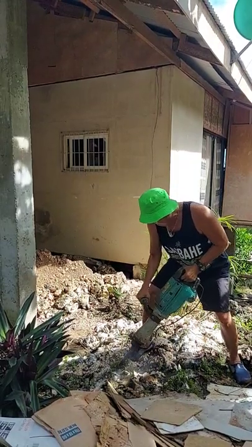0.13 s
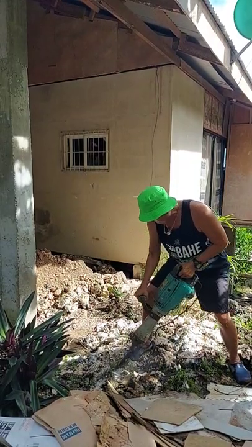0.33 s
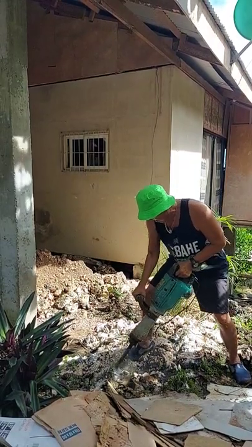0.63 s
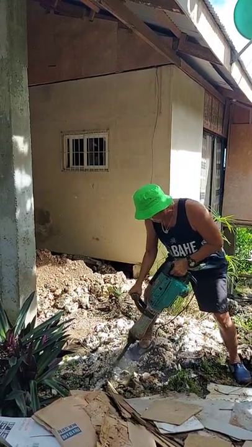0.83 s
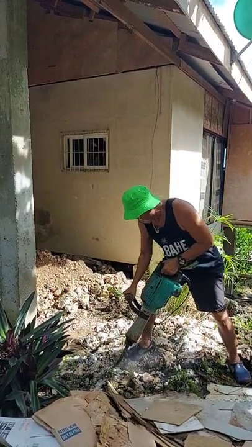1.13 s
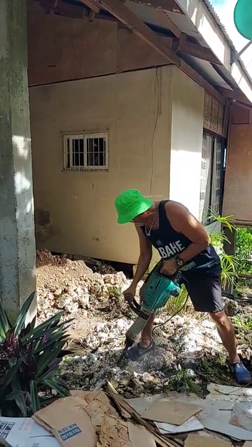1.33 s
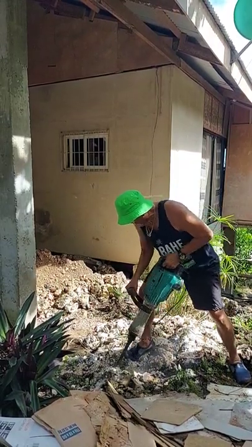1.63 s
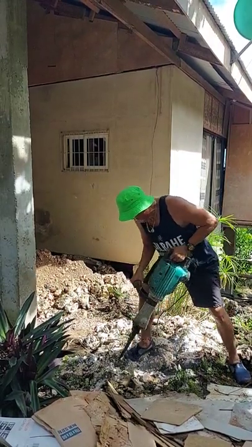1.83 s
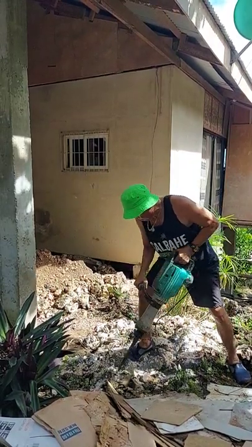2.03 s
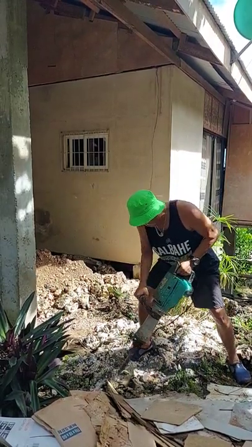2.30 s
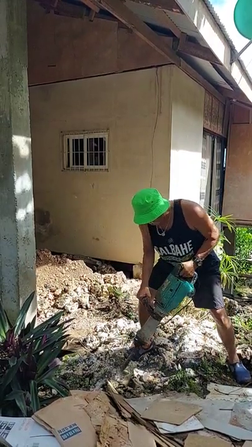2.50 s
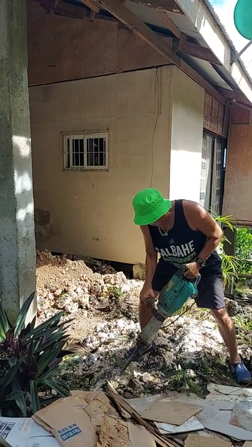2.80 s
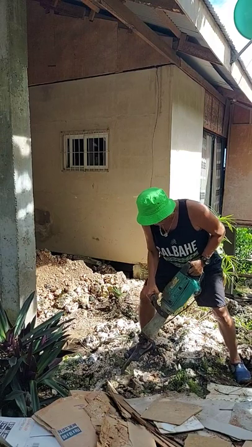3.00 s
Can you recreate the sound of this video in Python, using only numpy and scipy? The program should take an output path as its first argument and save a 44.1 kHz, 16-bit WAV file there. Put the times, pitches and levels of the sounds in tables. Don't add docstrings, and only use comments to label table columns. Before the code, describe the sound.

An electric demolition hammer works rocky ground outdoors, a few metres from a phone. Two soft idle knocks precede hard blows from 0.2 s, about 17 per second, with stony cracks, low thumps and bright steel ringing over motor roar. From 1.6 s soil muffles them; at 2.35 s they bite again, slow, ring loose near 2.8 s, and the motor fades to faint knocks around 3 s. Short wall echoes, low yard rumble.

```python
import sys
import numpy as np
from scipy import signal
from scipy.fft import rfft, irfft
from scipy.io import wavfile
from scipy.ndimage import uniform_filter1d

SR = 44100
rng = np.random.default_rng(int(sys.argv[2]) if len(sys.argv) > 2 else 0)


def linear_from_db(decibels):
    return 10 ** (np.asarray(decibels, float) / 20)


def pcm_store(signal):
    levels = np.round(np.clip(np.atleast_2d(signal), -1, 1) * 32767)
    wavfile.write(sys.argv[1], SR, levels.astype(np.int16).T)


N = 138915


def evened(x):
    return x / np.sqrt(np.mean(x ** 2) + 1e-20)


def colour(x, points, bumps=()):
    hz = np.fft.rfftfreq(len(x), 1 / SR)
    f, curve_db = np.transpose(points)
    db = np.interp(np.log(hz + 1), np.log(f + 1), curve_db)
    for centre, width, up_db in bumps:
        db = db + up_db * np.exp(-2 * ((hz - centre) / width) ** 2)
    return evened(irfft(rfft(x) * linear_from_db(db), len(x)))


def ring(t, hz, db, t60, phase=0):
    return linear_from_db(db - 60 * t / t60) * np.sin(2 * np.pi * (hz * t + phase))


def add(mix, s, sound):
    part = mix[round(s * SR):][:len(sound)]
    part += sound[:len(part)]


def row_at(table, s, other):
    return next((row[1:] for row in table if abs(row[0] - s) < .006), other)


# (time [s], crack [dB], thump [dB], thud [dB], ring [dB])
HARD_BLOWS = [(0.2238, -6, -35, -22, -14), (0.2803, -11.5, -30.5, -31, -15), (0.3427, -6.5, -35, -15, -16),
              (0.404, -9, -22, -18.5, -12.5), (0.4608, -5.5, -54, -19, -22.5),
              (0.5184, -12.5, -25.5, -22.5, -20.5), (0.5807, -8.5, -27.5, -28, -16),
              (0.6389, -6, -32, -52, -18.5), (0.6982, -9, -39, -14, -17), (0.757, -9, -37, -47, -17),
              (0.817, -8, -23.5, -15, -14.5), (0.8763, -10, -34, -23.5, -16.5),
              (0.9355, -8.5, -39, -35, -16), (0.995, -9, -40, -55, -18), (1.056, -9.5, -38.5, -48, -18.5),
              (1.113, -12, -36.5, -50, -23.5), (1.171, -11, -36, -45, -25.5),
              (1.2291, -11, -29, -28, -18.5), (1.288, -13.5, -34.5, -36, -18.5),
              (1.3498, -13.5, -35, -39, -20), (1.41, -13.5, -36, -33, -18.5), (1.4704, -15, -36, -29, -19),
              (1.5314, -12.5, -34, -47, -18), (1.5892, -11.5, -35.5, -50, -21)]
# (time [s], crack [dB], thump [dB], thud [dB], ring [dB])
MUFFLED_BLOWS = [(0.0477, -21.5, -57, -42, -38.5), (0.1068, -18, -58, -38, -40),
                 (1.6484, -16.5, -39.5, -45, -31), (1.698, -13, -49, -36, -49),
                 (1.7082, -16.5, -48, -30, -35), (1.77, -18, -58, -32, -35), (1.828, -16.5, -51, -34, -35),
                 (1.8882, -18.5, -49, -34, -36), (1.9513, -17.5, -53, -35, -42),
                 (2.0101, -17, -61, -32.5, -32), (2.0707, -18, -61, -32, -33.5),
                 (2.1299, -19, -63, -35, -36), (2.1906, -14, -54, -54, -29.5),
                 (2.2517, -16.5, -47, -28, -32), (2.3105, -17, -38, -28, -39)]
# (time [s], crack [dB], thump [dB], thud [dB], ring [dB])
LAST_BLOWS = [
    (2.371, -7.5, -25.5, -15.5, -18.5),
    (2.4296, -9, -26, -20.5, -15),
    (2.487, -9.5, -31, -18.5, -17),
    (2.5573, -7, -39, -25.5, -13.5),
    (2.6354, -8, -41, -31, -20.5),
    (2.7314, -12, -35.5, -56, -17.5),
    (2.8443, -16, -36, -28, -19),
    (2.8645, -17.5, -44, -34, -22.5),
    (3.014, -27.5, -54, -77, -65),
    (3.0627, -26, -52, -66, -64),
]


def blows():
    mix, t = np.zeros(N), np.arange(8192) / SR
    for s, crack_db, thump_db, thud_db, ring_db in HARD_BLOWS + MUFFLED_BLOWS + LAST_BLOWS:
        struck = rock(t, s, crack_db, thud_db) + ground(t, s, thump_db, thud_db)
        add(mix, s - .001, struck + chisel(t, s, ring_db))
    return mix


# (main shard [Hz], low steel pair [dB],
# high steel pair [dB], lean from the 7.8 to the 8.1 kHz mode [dB])
BLOW_LANDING = [(2750, -4.0, -2, 10), (4440, 5, 1, 1), (2050, 6, 6.0, 5), (4550, 1, -2, 3),
                (1710, 7.0, 10, -2), (4110, 8.5, 7, 1.0), (4200, 3.5, 7.5, -4), (1400, 9.5, 7.0, -2),
                (3000, -4.0, 4, 3), (1725, 1.5, -9, -3), (4629, 0, -5, 2), (1253, 4, 4, 0),
                (2980, 4.5, -0.5, -3), (1770, 0.0, 1, -2), (3150, 4.5, 1, -4), (2940, 1, 8, -3.0),
                (4140, 10, 5, -3), (1740, 3, 6, -8), (3030, -3, 6, -3), (4190, -1, 11, -5),
                (3160, 0, 5.0, -3), (1990, -3, -2.0, -11), (3760, -1, -1.0, -6), (3250, -8, 2, -4),
                (1600, 2.5, 7, -2), (1340, -7.0, 8, -1), (1225, 5.0, 7.5, -3), (2180, -2, 1, -1),
                (1701, 2, 7.5, -1), (2965, 9.0, 5, 1.5), (1154, 6, 2.5, 5.5), (3070, 4, 8, -5)]


def landing(s):
    rows = [(blow[0], *row) for blow, row in zip(HARD_BLOWS + LAST_BLOWS, BLOW_LANDING)]
    return row_at(rows, s, [3002, 0, 6, 2.5])


# (frequency [Hz], density [dB])
CRACK_SPECTRUM = [(180, -54), (300, -3), (3520, -4), (5340, -1.5), (6000, -7), (8090, -5), (9710, -20.5),
                  (11500, -6.5), (16000, -11.5)]


def rock(t, s, db, thud_db):
    muffled_db = np.clip(-15 - db, 0, 4)
    thin_db = np.clip(-23.5 - thud_db, 0, 20)
    dulling = [(12000, 13500, -6 * muffled_db), (450, 1540, -0.38 * thin_db)]
    burst = colour(rng.standard_normal(len(t)), CRACK_SPECTRUM, dulling)
    burst *= linear_from_db(-60 * t / 0.034) + linear_from_db(3.5 - 60 * t / 0.0097)
    low_hz, high_hz, shard_t60 = 1486, 4860, 0.021
    shards = ring(t, landing(s)[0], 1.5, shard_t60)
    for pitch, weak, late in rng.random((4, 3)):
        hz = low_hz * (high_hz / low_hz) ** pitch
        shards += ring(np.maximum(t - 0.003065 * late, 0), hz, -15 - 10 * weak, shard_t60)
    rise_s = 0.0014 + 0.00074 * muffled_db
    return linear_from_db(db - 6.5) * (burst + shards) * np.minimum(t / rise_s, 1)


# (frequency [Hz], level [dB], t60 [s])
CHISEL_MODES = [(1110, -44, .2), (5270, -17, .12), (5459, -13, .15), (7845, -5, .25), (8060, -11, .12),
                (8150, -4, .25), (8250, -11, .08), (11410, -15, .09), (11585, -16, .15), (12480, -22, .17),
                (13470, -30, .1), (14930, -26, .14), (15350, -27, .14)]
# (from [s], to [s], frequency [Hz], change [dB])
FREED_MODES = [
    (1.27, 1.6, 12480, 9),
    (1.27, 1.66, 8040, -7),
    (1.27, 1.66, 5370, -9),
    (2.83, 2.85, 1110, 24),
    (2.12, 2.27, 11500, 7),
    (1.25, 1.72, 11500, -13),
    (1.76, 1.78, 5370, 14),
    (1.15, 1.6, 589, 17),
    (2.7, 3.1, 500, -12),
]
# (frequency [Hz], density [dB])
RATTLE_SPECTRUM = [(2500, -46), (5000, -2), (6800, -7), (8300, 13), (9500, -26), (11500, -5), (13000, 0),
                   (15700, -1.5)]


def mode_changes(s):
    _, low_db, high_db, lean_db = landing(s)
    hz = [4000, 5200, 5500, 7900, 8050, 8300, 11400, 11600, 12400]
    db = [0, low_db, low_db, -lean_db / 2, lean_db / 2, lean_db / 2, high_db, high_db, 0]
    return [sum(up for t0, t1, c, up in FREED_MODES if t0 < s < t1 and abs(f / c - 1) < .03)
            + np.interp(f, hz, db) for f, *_ in CHISEL_MODES]


def squeak(t, wobble, chance):
    glide_s = .012
    glide = 1095 * glide_s * (0.6 + chance[3]) * np.exp(-t / (glide_s * (.7 + chance[3])))
    return ring(t, 13000, -9.5 - 6 * chance[2], 0.13, glide + 8 * wobble)


def chisel(t, s, db):
    detune, spread = rng.standard_normal((len(CHISEL_MODES), 2)).T
    chance = rng.random(len(CHISEL_MODES))
    drift = evened(uniform_filter1d(rng.standard_normal((3, len(t))), round(0.011 * SR), axis=1))
    wobble = .07 * uniform_filter1d(drift, 200, axis=1)
    grip = linear_from_db(4.5 * uniform_filter1d(drift, 60, axis=1) * np.minimum(t / 0.033, 1))
    changes, loose = mode_changes(s), s > 2.7
    hz = np.fft.rfftfreq(len(t), 1 / SR)
    modes, skirts = np.zeros(len(t)), np.zeros(len(hz))
    for k, (f, mode_db, t60) in enumerate(CHISEL_MODES):
        level_db = mode_db + changes[k]
        phase = chance[k] + wobble[(k + 1) % 3]
        modes += grip[k % 3] * ring(t, f * (1 + 0.001 * detune[k]), level_db - spread[k], t60, phase)
        skirts += linear_from_db(level_db) / (1 + ((hz - f) / 300 * 2) ** 2)
    if 1.27 < s < 1.6:
        modes += grip[2] * squeak(t, wobble[0], chance)
    fuzz = evened(irfft(rfft(rng.standard_normal(len(t))) * skirts, len(t)))
    fuzz *= linear_from_db(-13.5 - 60 * t / 0.32)
    rattle = colour(rng.standard_normal(len(t)), RATTLE_SPECTRUM) * linear_from_db(-9.5 - 60 * t / 0.25)
    noise_gain = linear_from_db(-7 if loose else 0)
    steel = modes + noise_gain * (fuzz * grip[0] + rattle * grip[1])
    clang = 1 + linear_from_db(7 - 60 * t / (.04 if loose else 0.0041))
    rebound_s = 0.0424 * (0.99 + 0.66 * chance[1])
    rebound = linear_from_db(4 * 2 * chance[0] * np.exp(-((t - rebound_s) / 0.004) ** 2))
    return linear_from_db(db) * steel * np.minimum(t / 0.00041, 1) * clang * rebound


# (time [s], frequency [Hz])
SWING_PITCH = [
    (.2801, 95),
    (.404, 65),
    (.5808, 71),
    (.6387, 73),
    (.7569, 93),
]
# (frequency [Hz], density [dB])
RUBBLE_SPECTRUM = [(30, -30), (80, 9), (200, -27), (330, 19), (600, -47), (20000, -90)]
# (frequency [Hz], level [dB], t60 [s])
BODY_MODES = [(292, -69, 0.19), (589, -43.5, 0.085)]


def ground(t, s, thump_db, thud_db):
    chance = rng.random(4)
    u = np.maximum(t - 0.0021, 0)
    usual_hz = 101.5 if .9 < s < 2.35 else 47
    swing_hz = row_at(SWING_PITCH, s, [usual_hz * (0.943 + 0.13 * chance[0])])[0]
    falling = u + (.02 if swing_hz < 90 else .003) * (1 - np.exp(-u / 0.006))
    thump = linear_from_db(thump_db + 8.5 - 60 * u / 0.077) * np.sin(2 * np.pi * swing_hz * falling)
    thump *= np.minimum(u / 0.0019, 1)
    rubble = colour(rng.standard_normal(len(t)), RUBBLE_SPECTRUM) * linear_from_db(thump_db - 9 - 60 * u / 0.097)
    rubble *= np.minimum(u / 0.0088, 1)
    thud_hz, thud_t60 = 309, 0.025
    thud = ring(u, thud_hz * (0.88 + 0.2 * chance[1]), thud_db + 2, thud_t60)
    thud += ring(u, 1.37 * thud_hz, thud_db, thud_t60 / 2)
    knock = np.zeros(len(t))
    for (f, db, t60), q in zip(BODY_MODES, chance[2:]):
        up_db = sum(up for t0, t1, c, up in FREED_MODES if t0 < s < t1 and c < 2 * f and f < 1.5 * c)
        knock += ring(t, f * (.96 + 0.038 * q), db - 6 * q + up_db, t60)
    return thump + rubble + thud + knock


# (time [s], frequency [Hz], level [dB], t60 [s])
SLAB_KNOCKS = [
    (.597, 260, -21, 0.041),
    (.603, 74.5, -25, 0.072),
    (.6395, 611, -24, 0.096),
    (2.436, 167, -15.5, 0.039),
    (2.515, 300, -29, 0.074),
    (3.045, 80, -40, .1),
]


def slabs():
    mix, t = np.zeros(N), np.arange(8192) / SR
    for s, hz, db, t60 in SLAB_KNOCKS:
        add(mix, s, ring(t, hz, db, t60) * np.minimum(t / 0.0057, 1))
    return mix


# (time [s], level [dB])
MOTOR_LEVEL = [(0.0, -38), (0.11, -37), (0.37, -38), (1.0, -34), (1.82, -35.5), (2.33, -32), (2.54, -37),
               (2.74, -37.5), (2.82, -42.5), (3.04, -50.5), (3.15, -52)]
# (frequency [Hz], density [dB])
WHIRR_SPECTRUM = [(30, -4), (100, 0), (300, -3.5), (700, -4), (3870, 1.5), (8500, -11), (12000, -10.5),
                  (16000, -12.5)]
# (frequency [Hz], width [Hz], gain [dB])
MOTOR_RESONANCES = [(203, 83, -21.5), (286, 66, 10.5), (593, 85, 8.5), (920, 133, -6.5), (1930, 135, -5),
                    (8650, 390, 13.5), (9600, 1450, -8)]


def motor():
    frames = N // 128 + 6
    a, b, patch = rng.standard_normal((frames, 257, 3)).T
    patch = evened(uniform_filter1d(uniform_filter1d(patch, 8, 0), 10, 1))
    flicker = evened(uniform_filter1d(rng.standard_normal(frames), 3))
    spectra = (a + 1j * b) * linear_from_db(1.8 * patch + 2.08 * flicker)
    roar = signal.istft(spectra, nperseg=512, noverlap=384)[1][:N]
    grit = linear_from_db(7.5 * np.minimum(rng.exponential(1, N), 3))
    grit *= rng.random(N) < 1200 / SR
    grit *= rng.choice([-1, 1], N)
    grain = rng.standard_normal(200) * np.exp(-np.arange(200) / 30)
    grit = signal.oaconvolve(grit, grain)[:N]
    s, db = np.transpose(MOTOR_LEVEL)
    whirr = colour(evened(roar) + linear_from_db(-9.5) * evened(grit), WHIRR_SPECTRUM, MOTOR_RESONANCES)
    return whirr * linear_from_db(3.5 + np.interp(np.arange(N) / SR, s, db))


# (delay [s], level [dB])
WALL_ECHOES = [(.0045, -25), (.0095, -26), (0.016, -22.5)]


def yard(x):
    taps = np.zeros(SR // 2)
    at = np.arange(300, SR // 2 - 20, 20)
    taps[at + rng.integers(0, 20, len(at))] = rng.choice([-1., 1.], len(at))
    taps *= linear_from_db(-60 * np.arange(len(taps)) / SR / 0.38)
    taps *= linear_from_db(-14) / np.linalg.norm(taps)
    for s, db in WALL_ECHOES:
        taps[round(s * SR)] += linear_from_db(db)
    return x + signal.fftconvolve(x, taps)[:N]


# (frequency [Hz], density [dB])
AIR_SPECTRUM = [(20, -23), (55, 7), (150, -18), (600, -69), (4000, -11), (16000, -52)]


def air():
    return linear_from_db(-50) * colour(rng.standard_normal(N), AIR_SPECTRUM)


def scene():
    return (yard(blows() + slabs()) + motor() + air())[None]


def low_pass(x):
    return signal.sosfilt(signal.butter(12, 16970, fs=SR, output="sos"), x)


def record(dry):
    limit, edge_hz = .75, 15750
    x = signal.lfilter(*signal.butter(2, 42, "high", fs=SR), dry)
    x = limit * np.tanh(x / limit)
    band = signal.firwin(401, edge_hz, window=("kaiser", 3), fs=SR)
    mix = signal.oaconvolve(x, band[None], "same")
    return low_pass(mix)


dry = scene()
out = record(dry)
pcm_store(out)
```